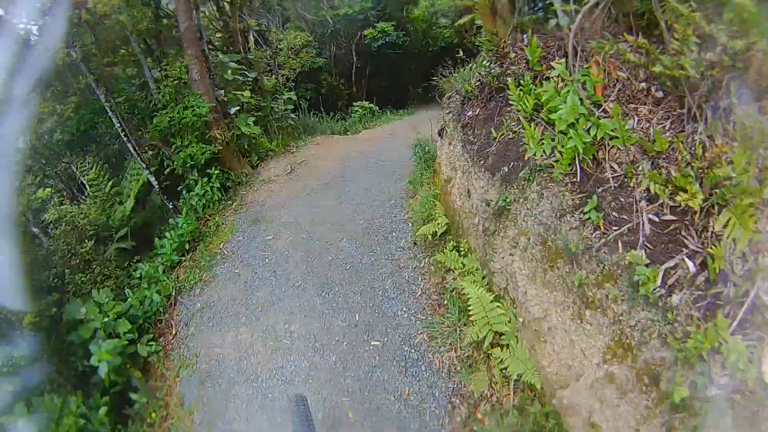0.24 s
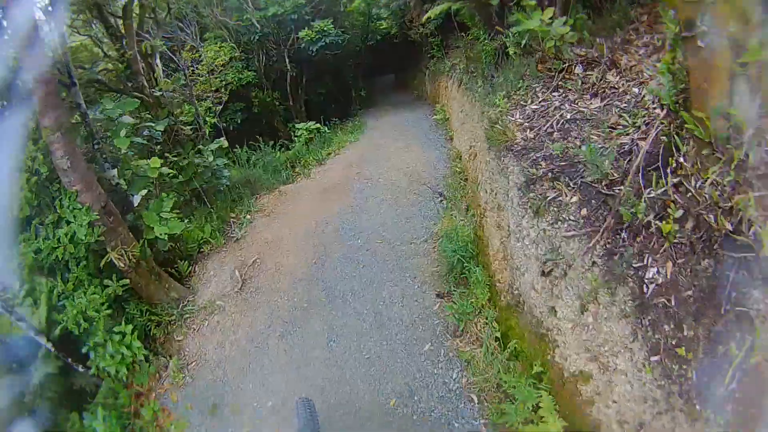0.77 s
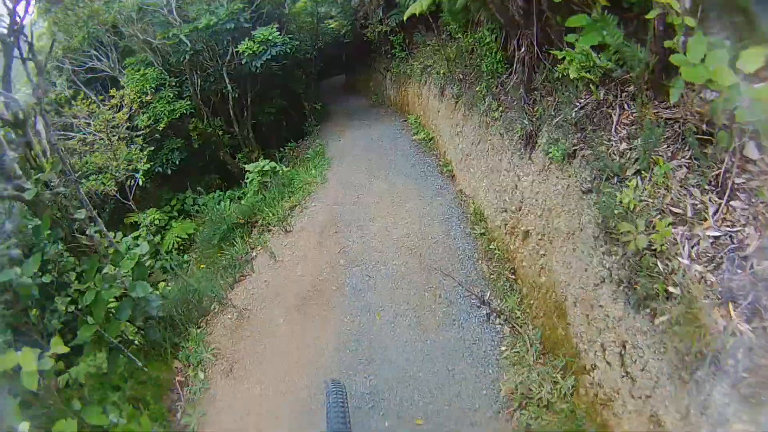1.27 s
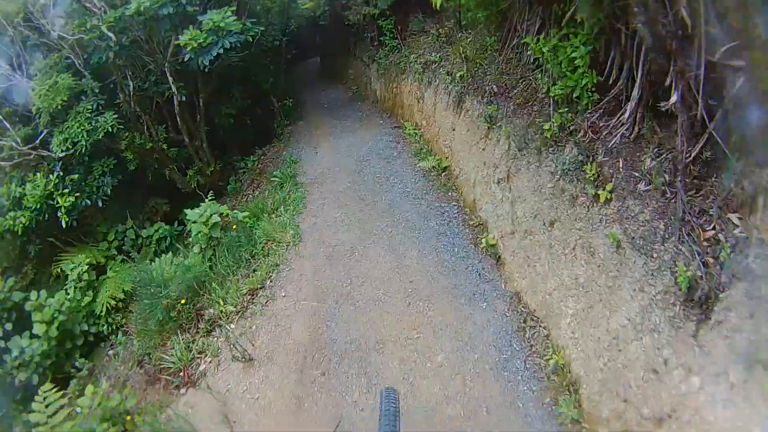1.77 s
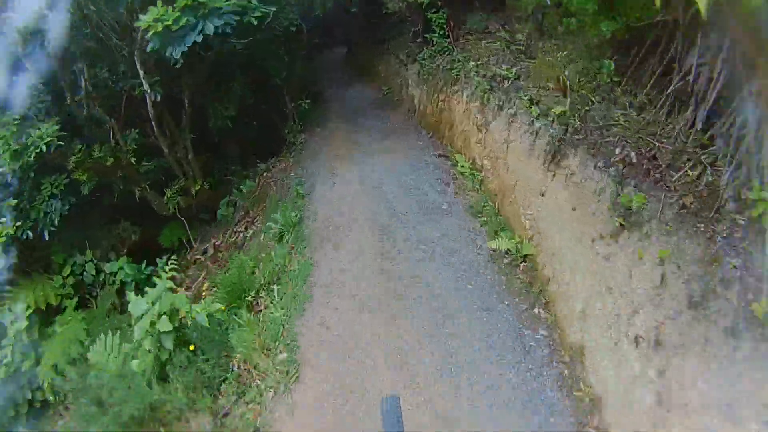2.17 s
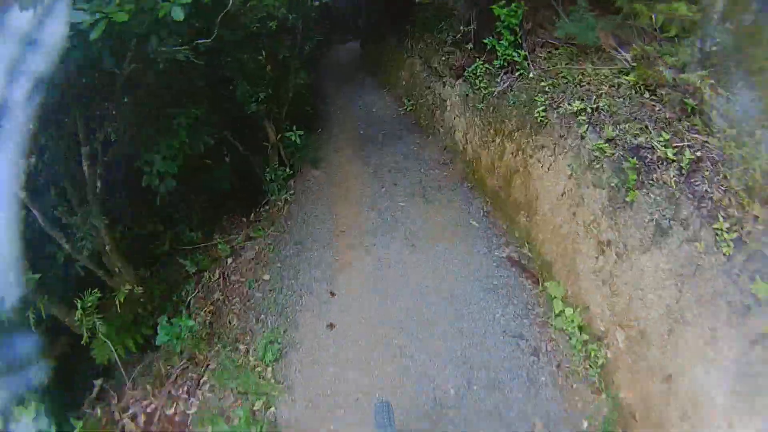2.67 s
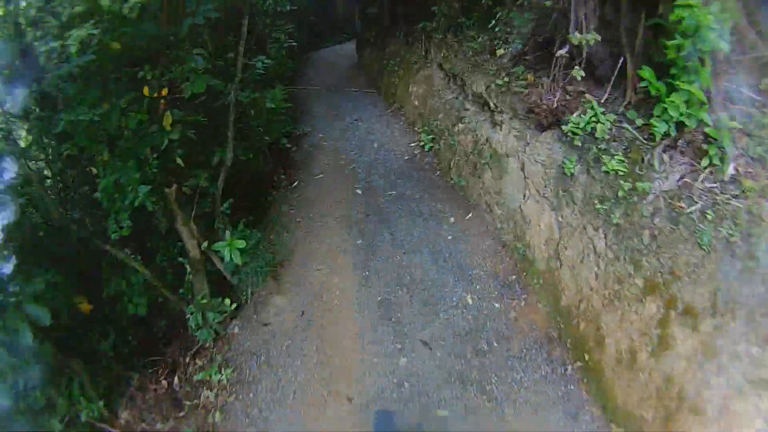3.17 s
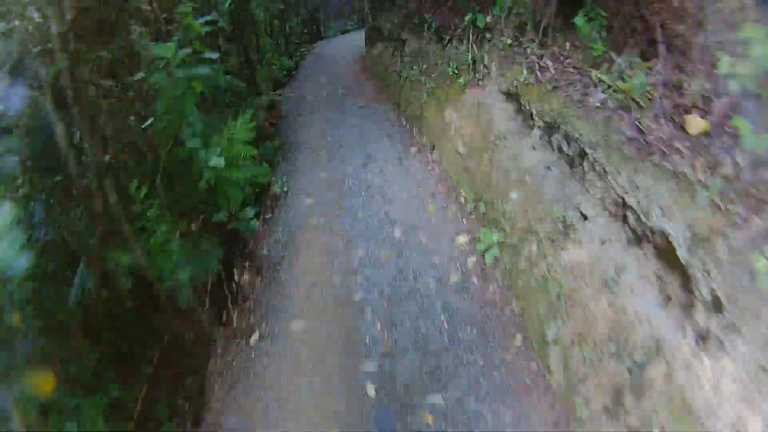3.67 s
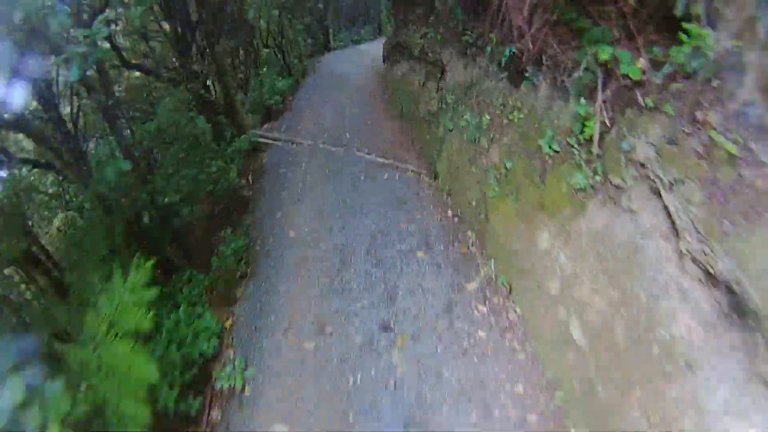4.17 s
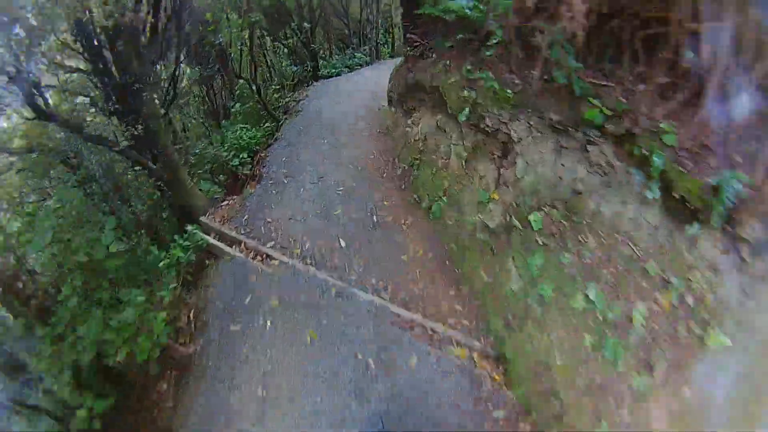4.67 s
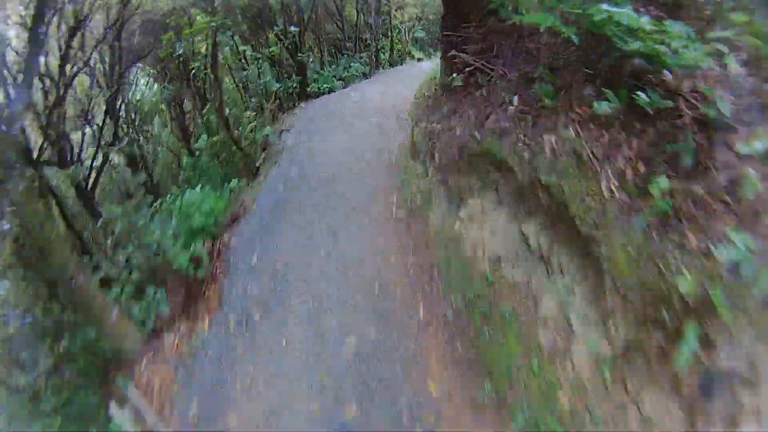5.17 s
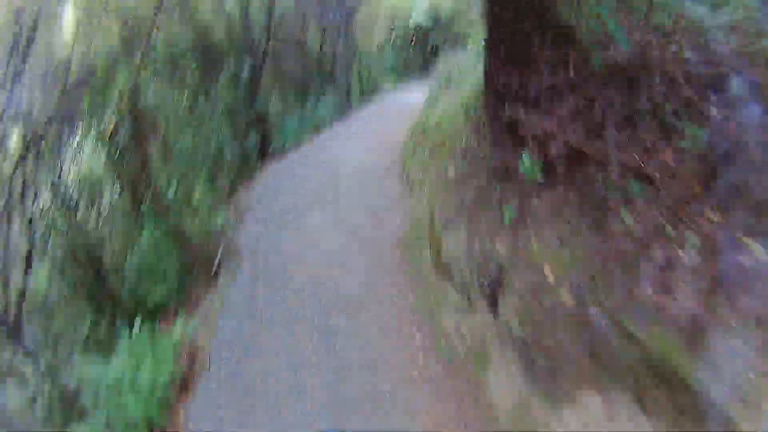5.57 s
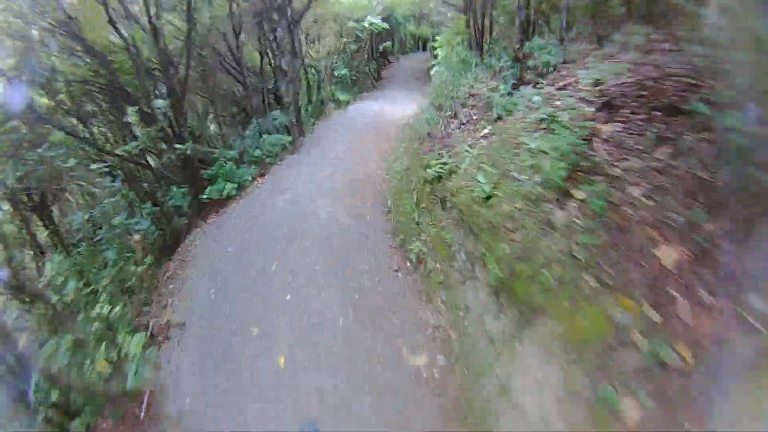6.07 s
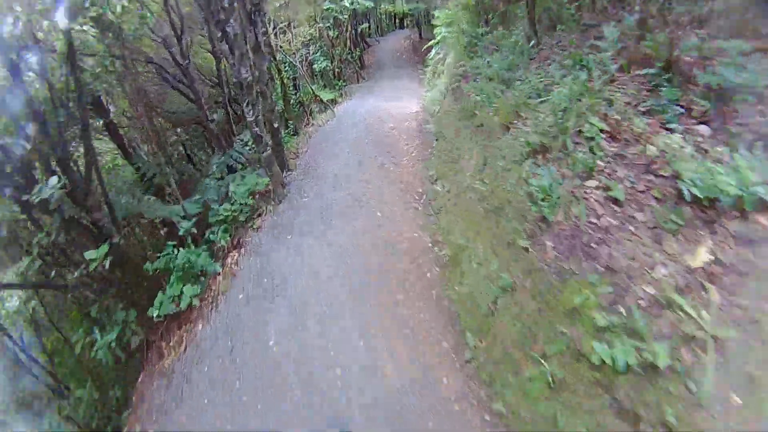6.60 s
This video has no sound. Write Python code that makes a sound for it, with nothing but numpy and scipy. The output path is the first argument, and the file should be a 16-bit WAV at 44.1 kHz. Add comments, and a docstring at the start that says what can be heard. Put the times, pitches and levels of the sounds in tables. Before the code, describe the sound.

A microphone mounted on a mountain bike hears everything close and dry, with faint steady hiss and a barely audible high whine. From 0 to 2 s the tyres crunch softly over gravel, with light knocks and tiny stone pings, quietest around 1.3 s. A small knock comes at 1.7 s, then a hard, boomy one at 2.2 s and another at 2.5 s as the crunch and rumble rise. From 3.3 to 4.6 s the ride is roughest: rapid heavy knocks, a plastic crack near 3.4 s, loose parts rattling, gritty scrunches around 3.7 and 4.5 s, and strong thumps at 4.2 and 4.4 s. After a short easing, a heavy blow and crack hit at 5.1 s. The strongest thud comes at 5.5 s, with clatter and a short metallic clank at 5.6 s. Then knocks thin out, leaving quieter gravel, faint pings near 6.3 s and a little rattle at 6.8 s.

```python
"""Bumps on a gravel track knock the mount of a camera carried by a mountain biker: force pulses ring its modes.
Hard knocks bottom out with a thud and a boom; loose parts clatter as bursts of tiny contacts, plastic cracks.
Tyres crunch and scrunch as noise and grains through resonances; pebbles and flung stones ring briefly.
Underneath, shaped noise rumbles, the frame buzzes, and the electronics hiss and whine faintly."""
import sys
import numpy as np
from scipy import signal
from scipy.fft import rfft, irfft
from scipy.io import wavfile

SR = 44100
rng = np.random.default_rng(int(sys.argv[2]) if len(sys.argv) > 2 else 0)


def pcm_store(signal):
    """Save signal as 16-bit PCM."""
    levels = np.round(np.clip(np.atleast_2d(signal), -1, 1) * 32767)
    wavfile.write(sys.argv[1], SR, levels.astype(np.int16).T)


N = 301633
TIME = np.arange(N) / SR

# bumps that knock the mount: start_s, strength_db, contact_ms (decay constant)
KNOCK_ROWS = [(0.035, -28.5, 0.25), (0.1357, -23.5, 0.073), (0.25, -25.5, 0.043), (0.3803, -34, 0.14),
              (0.6444, -30, .2), (0.764, -38, .17), (0.8723, -32, 0.32), (1.043, -41, 0.11),
              (1.4695, -37.5, .1), (1.7355, -22.5, 0.087), (1.8005, -29, 0.16), (1.8763, -29, 0.25),
              (2.1936, -10.5, 0.11), (2.2103, -17, 0.26), (2.454, -26.5, 0.28), (2.5446, -14.5, 0.072),
              (2.6354, -25, 0.059), (2.6915, -22.5, .12), (2.8267, -18, .18), (2.987, -17.5, .12),
              (3.0469, -23, 0.59), (3.3335, -12.5, 0.13), (3.3581, -17, 0.56), (3.3843, -12, 0.2),
              (3.4244, -14.5, 0.077), (3.5073, -22, 0.069), (3.6188, -17, 0.086), (3.7296, -25, .03),
              (3.7763, -24, 0.15), (3.9251, -17, .056), (4.2322, -11.5, 0.13), (4.2693, -22.5, .16),
              (4.3848, -12, .1), (4.4604, -23.5, .2), (4.5613, -15, .072), (4.7066, -25.5, 0.21),
              (4.8756, -20.5, 0.049), (4.949, -34.5, .13), (5.0482, -31, 0.12), (5.1202, -9.5, 0.067),
              (5.1736, -19, 0.16), (5.2083, -20, 0.16), (5.3005, -16.5, .057), (5.3764, -16.5, 0.054),
              (5.4852, -7.5, 0.059), (5.547, -12.5, 0.47), (5.5848, -19.5, .03), (5.665, -30.5, 0.21),
              (5.8306, -21.5, 0.22), (6.077, -32.5, 0.19), (6.6659, -30, 0.066)]
# the mount springs back and hits its other stop: start_s, strength_db
REBOUND_ROWS = [(2.136, -24), (3.3636, -25), (3.439, -28), (3.5512, -25.5), (3.8449, -24), (3.9953, -23),
                (4.334, -22), (5.2355, -18.5), (5.4335, -21.5), (5.528, -32), (6.7922, -28)]
THUD_CONTACT_MS = 0.72


def from_db(db):
    """Decibels to amplitude gain."""
    return 10 ** (np.asarray(db) / 20)


def rms_one(x):
    """Scale to unit rms."""
    return x / np.sqrt(np.mean(x ** 2) + 1e-20)


def butter(x, hz, kind, order=2):
    """Causal Butterworth low- or high-pass."""
    sos = signal.butter(order, min(hz, 0.45 * SR), kind, fs=SR, output="sos")
    return signal.sosfilt(sos, x + 1e-18)


def drift(per_s):
    """Random drift: straight lines between normal values, per_s of them a second."""
    knots = rng.standard_normal(4000)
    return np.interp(TIME * per_s, np.arange(len(knots)), knots)


def coloured_noise(spectrum):
    """Unit-rms noise; spectrum rows are pitch_hz, level_db, joined on a log-frequency axis."""
    hz, db = np.transpose(spectrum)
    bins_hz = np.maximum(np.arange(N // 2 + 1) * SR / N, 1)
    gain = from_db(np.interp(np.log(bins_hz), np.log(hz), db))
    return rms_one(irfft(rfft(rng.standard_normal(N)) * gain, N))


def ring(force, hz, t60_s):
    """One mode: a unit click starts a sine that decays 60 dB in t60_s."""
    r = np.exp(-np.log(1000) / (t60_s * SR))
    w = 2 * np.pi * hz / SR
    return signal.lfilter([0, np.sin(w)], [1, -2 * r * np.cos(w), r * r], force + 1e-18)


def resonate(x, resonances):
    """Parallel resonances of alternating sign, scaled by their summed white-noise power."""
    out, power = 0, 0
    for k, (hz, width_hz, db) in enumerate(resonances):
        r, gain = np.exp(-np.pi * width_hz / SR), from_db(db)
        zeros = np.array([1, 0, -1]) * (1 - r * r) / 2
        poles = [1, -2 * r * np.cos(2 * np.pi * hz / SR), r * r]
        out = out + (-1) ** k * gain * signal.lfilter(zeros, poles, x + 1e-18)
        power += gain ** 2 * (1 - r * r) / 2
    return out / np.sqrt(power)


def pushes(rows):
    """Force pulses of (start_s, db, contact_ms): a longer contact gives a duller blow."""
    force, n = np.zeros(N + SR), np.arange(SR // 50)
    for start_s, db, contact_ms in rows:
        pulse = (n + 1) * np.exp(-1000 * n / (contact_ms * SR))
        force[round(start_s * SR) + n] += from_db(db) * pulse / pulse.sum()
    return force[:N]


def grains(per_s, spread_db):
    """Random tiny impacts of unequal size and either sign, unit rms."""
    sizes = from_db(spread_db * np.minimum(rng.exponential(1, N), 4))
    signs = rng.choice([-1, 1], N)
    return rms_one(sizes * signs * (rng.random(N) < per_s / SR))


def mount(jiggle_db, vary_db, buzz_db):
    """Bumps push the mount one way, rebounds the other; small stones jiggle it; its modes ring."""
    # modes of mount and case: pitch_hz, level_db, t60_s, direction (+1 or -1)
    modes = [(43.5, 0.3, 0.093, 1), (64.9, 3, 0.032, -1), (183.9, -12.5, 0.072, -1), (265, -6, 0.013, -1),
             (484, -14, 0.041, -1), (880, -32, 0.071, -1), (1256, -4.5, 0.0086, -1), (1433, -6.5, 0.016, 1),
             (1770, -12.5, 0.016, 1), (2000, -9.5, 0.0065, -1), (3116, -28.5, 0.03, -1),
             (5500, -26, 0.015, -1)]
    rebound_contact_ms = 0.05
    jiggle = butter(grains(per_s=24, spread_db=3.0), 1600, "low") * from_db(buzz_db + jiggle_db)
    knocks = pushes(KNOCK_ROWS + thuds())
    rebounds = pushes([(start_s, db, rebound_contact_ms) for start_s, db in REBOUND_ROWS])
    force = knocks - rebounds + jiggle
    out = 0
    for hz, db, t60_s, direction in modes:
        # each mode's level drifts, so blows share themselves differently among the modes
        gain = from_db(db + vary_db * drift(9))
        out = out + np.sign(direction) * gain * ring(force, hz, t60_s)
    return out


def overtravel():
    """What the hardest knocks have left when the mount's travel runs out: (start_s, db)."""
    travel_db = -13.5
    left_over = [(start_s, from_db(db) - from_db(travel_db)) for start_s, db, _ in KNOCK_ROWS]
    return [(start_s, 20 * np.log10(rest)) for start_s, rest in left_over if rest > 0]


def thuds():
    """Overtravel returns a moment later as a dull push, the stronger the harder the knock."""
    delay_s, relative_db = 0.00828, 4.5
    return [(start_s + delay_s, db + relative_db, THUD_CONTACT_MS) for start_s, db in overtravel()]


def boom():
    """Bottomed out, the mount is stiffer: overtravel rings one low mode."""
    hz, level_db, t60_s = 104.5, 3, 0.069
    force = pushes([(start_s, db, THUD_CONTACT_MS) for start_s, db in overtravel()])
    return -from_db(level_db) * ring(force, hz, t60_s)


def metal():
    """One slam sets the modes of a metal part of the bike ringing."""
    # modes: pitch_hz, level_db, t60_s
    modes = [(338, -38.5, 0.66), (490, -21.5, 0.05), (970, -29, 0.014), (1670, -25, 0.017),
             (2030, -26.5, 0.023), (2160, -52, 0.25), (3075, -28, 0.029), (4250, -46, 0.058)]
    slam_s, contact_ms = 5.5838, 0.039
    blow = pushes([(slam_s, 0, contact_ms)])
    return sum(from_db(db) * ring(blow, hz, t60_s) for hz, db, t60_s in modes)


def shaken(blows, delay_s, relative_db, length_ms):
    """Clatters that follow blows, in proportion to their strength."""
    return [(start_s + delay_s, db + relative_db, length_ms) for start_s, db, *_ in blows]


def clatter(rise_share, level_db):
    """Loose parts chatter: tiny contacts swell and die exponentially through resonances."""
    # further chatter, some alone and some just after blows or the slam:
    # peak_s, relative_db, length_ms (decay constant)
    further_rows = [(0.458, -45, 3.6), (2.115, -46.5, 5.3), (2.175, -41, 2.3), (2.601, -47.5, 14),
                    (2.643, -51, 6), (3.445, -35.5, 5.7), (4.352, -31.5, 2), (4.833, -43, 1.6),
                    (5.131, -39, 13), (5.167, -35.5, 2.2), (5.223, -33, 1), (5.253, -37, 3.7),
                    (5.286, -44, 5), (5.498, -35, 8.7), (5.518, -27.5, 4.8), (5.549, -38, 5.4),
                    (5.574, -33, 12.3), (5.5847, -20, 1.8)]
    # resonances: pitch_hz, width_hz, relative_db
    body = [(539, 80, 8.5), (880, 410, -5.5), (1328, 176, 5.5), (1846, 500, -2.5), (2038, 190, -0.5),
            (3177, 190, -11), (4010, 330, -13.5), (6100, 310, -25), (6800, 940, -27.5)]
    after_knocks = shaken(KNOCK_ROWS, delay_s=0.012, relative_db=-31, length_ms=5.7)
    after_rebounds = shaken(REBOUND_ROWS, delay_s=0.0021, relative_db=-15.5, length_ms=3.9)
    swell, lag = np.zeros(N + SR), np.arange(-SR // 25, SR // 15)
    for peak_s, db, length_ms in further_rows + after_knocks + after_rebounds:
        age = 1000 * lag / SR / length_ms
        # the rise constant is rise_share of the decay constant
        swell[round(peak_s * SR) + lag] += from_db(db) * np.exp(-np.maximum(age, -age / rise_share))
    contacts = swell[:N] * from_db(level_db) * grains(per_s=9000, spread_db=2.0)
    return butter(resonate(contacts, body), 6100, "low", order=4)


def cracks(peak_delay_s, body_db):
    """Hard plastic snaps: milliseconds of bright stick-slip noise plus a low-passed body."""
    # snaps: start_s, relative_db
    snap_rows = [(3.3837, -34.5), (3.441, -45), (5.1747, -32), (5.555, -37.5), (5.592, -47)]
    burst = np.zeros(N)
    for start_s, db in snap_rows:
        age = np.maximum(TIME - start_s, 0) / peak_delay_s
        burst += from_db(db) * age * np.exp(1 - age)
    snap = burst * rng.standard_normal(N)
    return butter(snap, 10200, "low") + from_db(body_db) * butter(snap, 640, "low", order=1)


def tyres(crunch_db, level_db, grain_db, flutter_db):
    """Gravel shifts under the tread: a smooth rush plus single stones, in uneven patches."""
    # resonances through which the tyres are heard: pitch_hz, width_hz, relative_db
    body = [(210, 220, -4.5), (580, 203, -4), (879, 40, -3.5), (1323, 150, 2.5), (1760, 407, -4),
            (2094, 147, 2), (3160, 117, -10), (3943, 295, -11), (5840, 220, -20.5), (7160, 940, -28)]
    stones = rng.standard_normal(N) + from_db(grain_db) * grains(per_s=220, spread_db=3.0)
    return resonate(rms_one(stones), body) * from_db(crunch_db + level_db + flutter_db * drift(60))


def scrunches(spread_db):
    """Tyres slide through looser gravel: dense grains under bell-shaped swells, through resonances."""
    # slides: middle_s, level_db, sigma_s
    slide_rows = [(3.266, -45.5, 0.017), (3.46, -51, 0.021), (3.63, -46.5, 0.014), (3.686, -42, 0.049),
                  (4.01, -47.5, 0.033), (4.485, -44.5, 0.036), (4.59, -47.5, 0.042)]
    # resonances: pitch_hz, width_hz, relative_db
    body = [(734, 410, -9.5), (1306, 180, 1), (1534, 97, 1), (2020, 240, -9.5), (3160, 170, -13.5),
            (3960, 250, -15.5), (6050, 3500, -35.5)]
    slide = 0
    for middle_s, db, sigma_s in slide_rows:
        slide = slide + from_db(db) * np.exp(-((TIME - middle_s) / sigma_s) ** 2 / 2)
    return slide * resonate(grains(per_s=3400, spread_db=spread_db), body)


def pebbles(crunch_db, level_db, t60_s):
    """Single stones pop from under the tread at twelve pitches, the case muffling higher ones."""
    pitches_hz = np.geomspace(1150, 4200, num=12)
    pops = 0
    for hz in pitches_hz:
        muffling = (pitches_hz[0] / hz) ** 1.5
        pops = pops + muffling * ring(grains(per_s=9, spread_db=2.6), hz, t60_s)
    return rms_one(pops) * from_db(crunch_db + level_db)


def pings(contact_ms):
    """Flung stones tap the bike's tubes, whose modes ring short and bright."""
    # stones: start_s, strength_db
    stone_rows = [(.049, -41), (.456, -47), (.704, -48), (0.9423, -48), (1.1715, -44.5), (1.537, -54),
                  (2.258, -50), (4.3494, -39), (6.329, -45), (6.396, -48)]
    # tube modes: pitch_hz, level_db, t60_s
    modes = [(2100, 1, 0.03), (2650, -12, 0.022), (3154, -10.5, 0.024), (4030, -14.5, 0.016),
             (5500, -24, 0.0093)]
    taps = pushes([(start_s, db, contact_ms) for start_s, db in stone_rows])
    return sum((-1) ** k * from_db(db) * ring(taps, hz, t60_s) for k, (hz, db, t60_s) in enumerate(modes))


def rumble(rumble_db, level_db):
    """The whole rig shakes with the ground: noise strongest near 18 Hz."""
    # pitch_hz, relative_db
    spectrum = [(5, -33), (18, 12.0), (32, 5), (60, -8.0), (110, -12.0), (175, -13), (260, -17),
                (600, -25.0), (3000, -93)]
    return coloured_noise(spectrum) * from_db(rumble_db + level_db)


def buzz(buzz_db, level_db):
    """Rough ground hums through the hollow frame: grains through two middle resonances."""
    hum = resonate(grains(per_s=900, spread_db=4), [(536, 115, 0), (607, 90, 0)])
    return from_db(buzz_db + level_db) * hum


def electronics(hiss_db, whine_db, duty):
    """Steady microphone hiss and a thin sine whine gated into rapid bursts."""
    # hiss spectrum: pitch_hz, relative_db
    hiss_spectrum = [(100, 20.5), (1000, 9.5), (1850, 1.5), (2120, 8), (2450, 6), (5000, -1.5),
                     (7500, -3.5), (10500, -4), (11450, 1), (12200, -5), (15500, -7.5)]
    whine_hz, bursts_per_s = 13750, 52.6
    bursts = butter(1.0 * (TIME * bursts_per_s % 1 < duty), 400, "low")
    whine = rms_one(bursts * np.sin(2 * np.pi * whine_hz * TIME))
    return from_db(hiss_db) * coloured_noise(hiss_spectrum) + from_db(whine_db) * whine


def scene():
    """All sources, dry; the ride is louder on fast and loose stretches."""
    # the ride: time_s, relative_crunch_db, relative_rumble_db
    ride_rows = [(0.0, -60.5, -48), (0.27, -62, -52), (1.29, -63.5, -56), (2.15, -57, -44),
                 (2.34, -54, -45), (2.66, -54.5, -43), (3.05, -53.5, -52.5), (3.31, -50, -46.5),
                 (3.5, -50, -48), (3.87, -51, -41), (4.04, -51.5, -49), (4.25, -49.5, -53),
                 (4.38, -50.5, -45), (5.03, -56, -48), (5.41, -56.5, -43), (5.66, -56, -55),
                 (6.19, -59, -58), (6.84, -55, -47)]
    time_s, *columns = np.transpose(ride_rows)
    crunch_db, rumble_db = [np.interp(TIME, time_s, column) for column in columns]
    # buzz and jiggle follow 0.31 of the crunch's swing in dB
    buzz_db = -62 + 0.31 * (crunch_db - crunch_db.mean())
    blows = mount(jiggle_db=-14.5, vary_db=1.6, buzz_db=buzz_db) + boom() + metal()
    rattle = clatter(rise_share=0.93, level_db=2) + cracks(peak_delay_s=0.00082, body_db=12.5)
    gravel = tyres(crunch_db, level_db=0.6, grain_db=-5, flutter_db=2.23) + scrunches(spread_db=1.5)
    stones = pebbles(crunch_db, level_db=-8.0, t60_s=0.018) + pings(contact_ms=0.025)
    shaking = rumble(rumble_db, level_db=1.5) + buzz(buzz_db, level_db=-4.5)
    background = electronics(hiss_db=-60.0, whine_db=-72.5, duty=0.66)
    return (blows + rattle + gravel + stones + shaking + background)[None]


def record(dry):
    """The deepest bass is reduced and the top of the treble is cut steeply."""
    cutoff_hz = 15900
    sound = butter(dry, 6, "high", order=1)
    # 0.1 dB ripple, 70 dB stopband
    return signal.sosfilt(signal.ellip(10, 0.1, 70, cutoff_hz, fs=SR, output="sos"), sound)


dry = scene()
out = record(dry)
pcm_store(out)
```